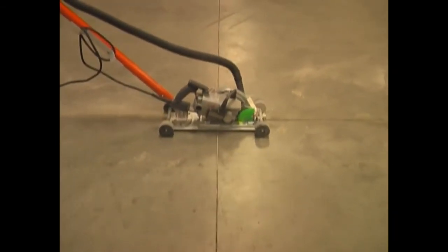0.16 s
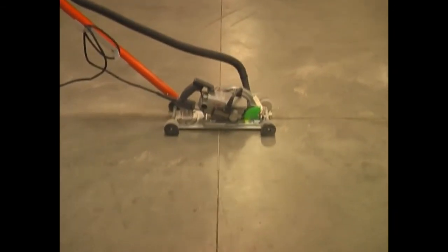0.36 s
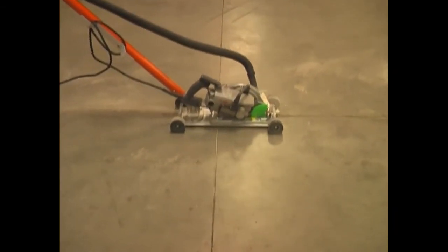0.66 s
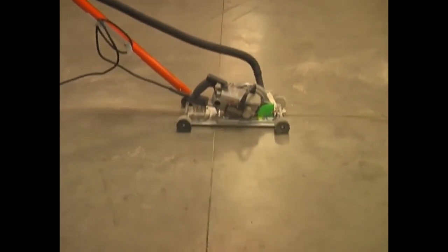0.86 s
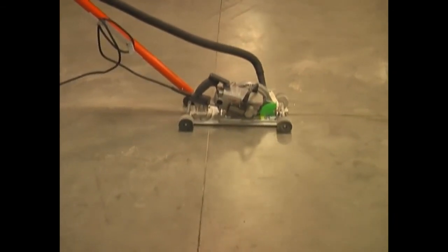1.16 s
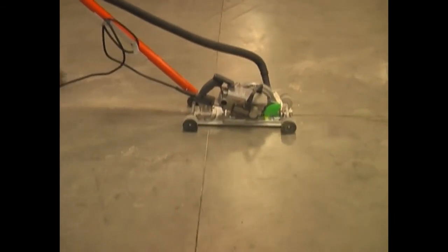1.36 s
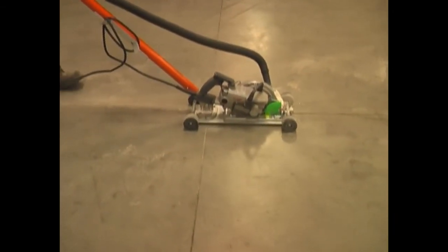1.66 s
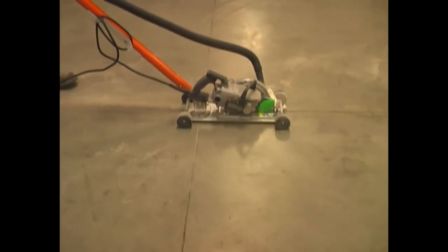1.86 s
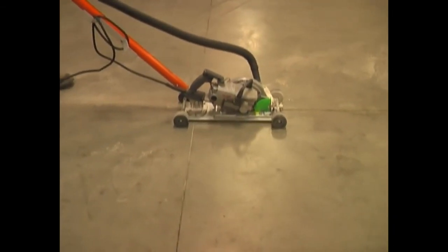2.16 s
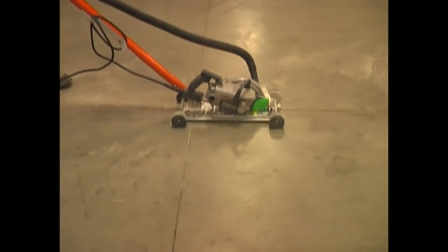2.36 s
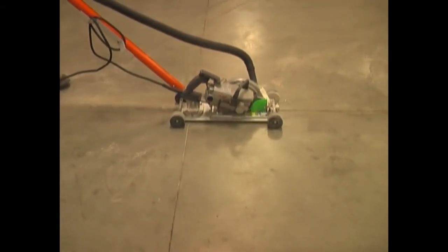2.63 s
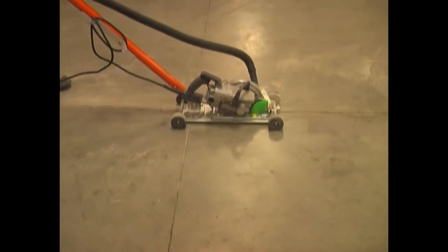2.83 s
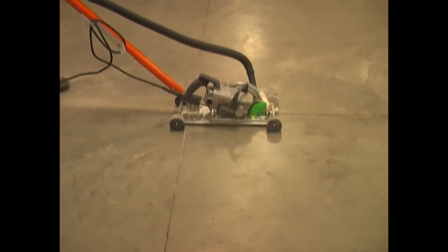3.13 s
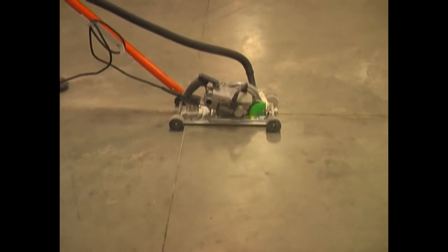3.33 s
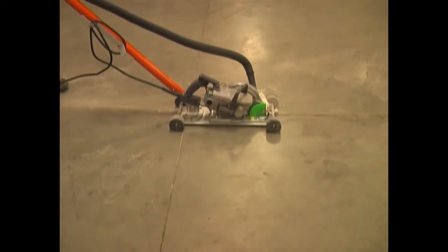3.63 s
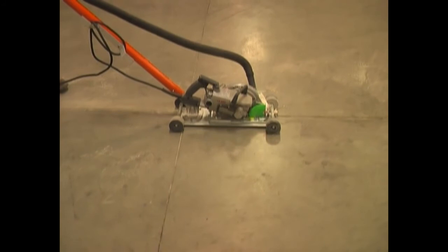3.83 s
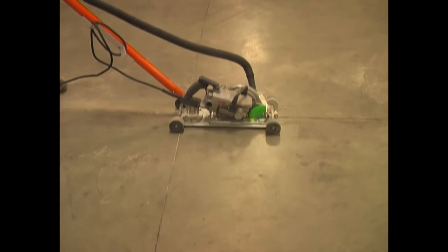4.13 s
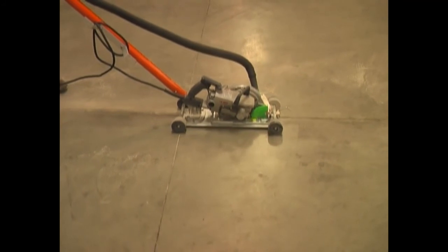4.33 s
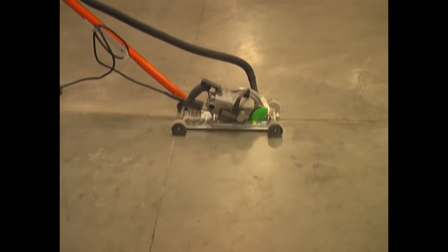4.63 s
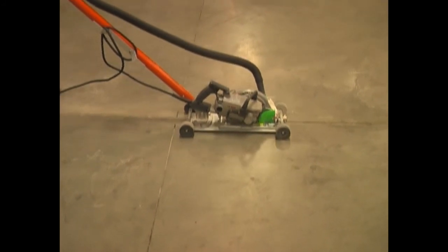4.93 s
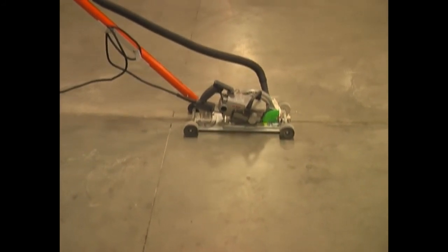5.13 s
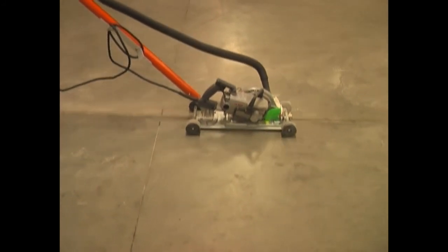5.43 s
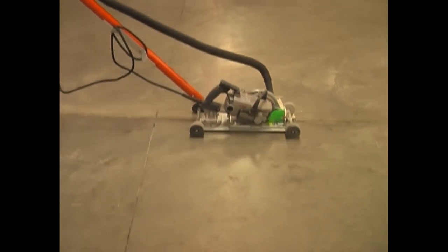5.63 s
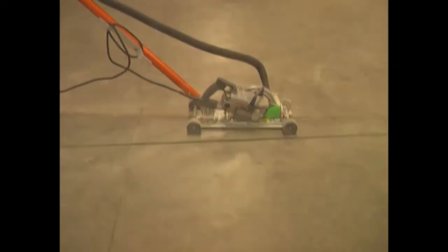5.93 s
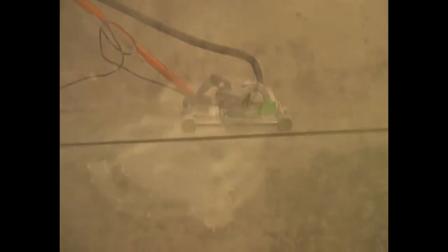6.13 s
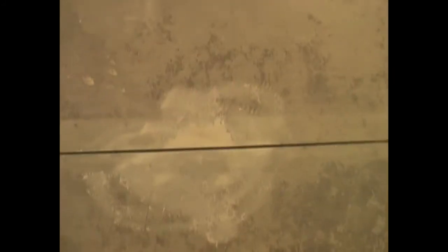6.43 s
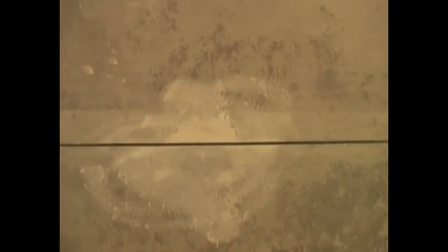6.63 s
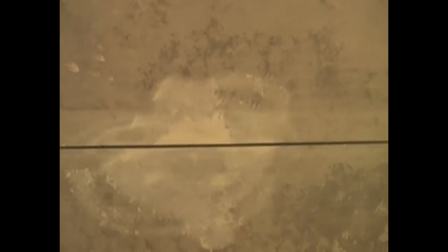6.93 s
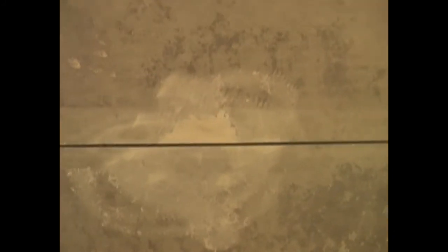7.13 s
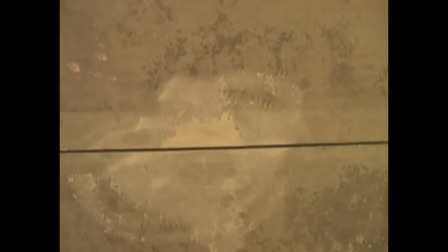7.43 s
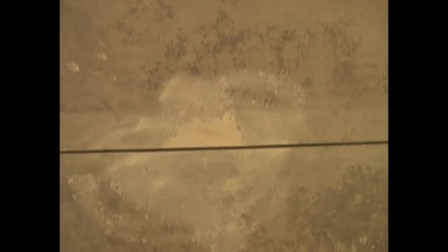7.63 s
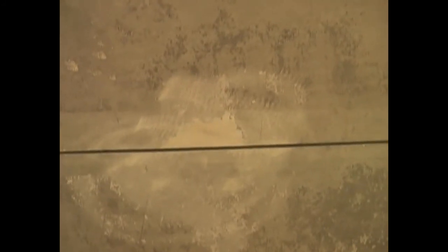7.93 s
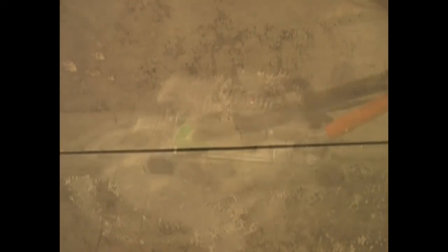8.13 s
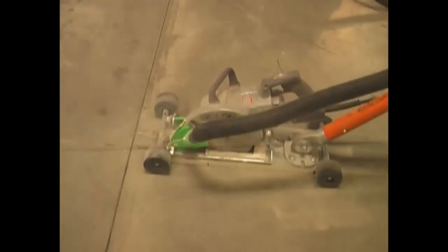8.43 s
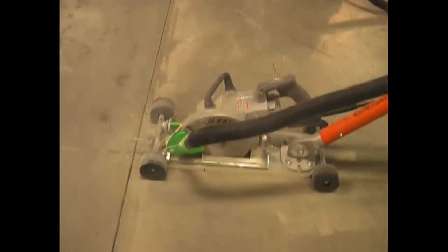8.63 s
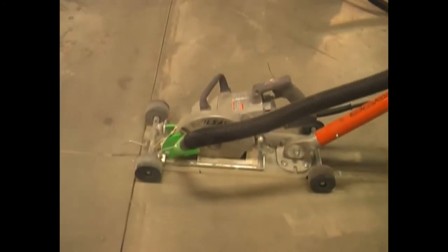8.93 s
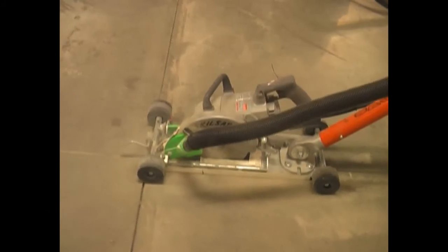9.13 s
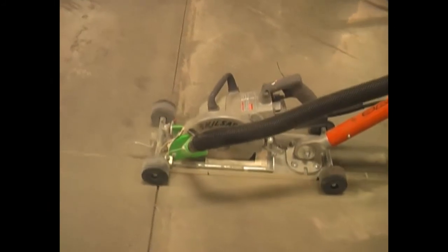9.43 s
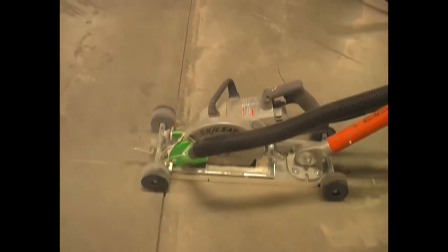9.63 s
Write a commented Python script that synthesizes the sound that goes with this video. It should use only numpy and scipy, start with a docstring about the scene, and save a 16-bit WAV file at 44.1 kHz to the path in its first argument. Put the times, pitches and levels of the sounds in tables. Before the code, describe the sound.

A floor saw is already running in a large, echoing warehouse, heard fairly close in stereo. From 0 to 1.5 s the motor whine rises from about 2.6 to 3.4 kHz over harsh, gritty grinding that pulses with each blade turn. Around 1.9 s the blade bites deep: the whine sags to its lowest near 4 s, while rapid woody-metallic knocks, some hard, rattle unevenly and a thin wavering vacuum whistle sits near 4.5 kHz. From 4.5 s the knocks die away and the motor speeds up again. Between 6 and 6.45 s it fades out, leaving soft, diminishing hiss, low rumble and mains hum, with a clearer tap at 6.6 s and fainter ones at 7.25 and 7.8 s. From 8 s brighter, steadier blade grinding fades in, without the motor whine; knocks ring the metal guard until the end, near 9.8 s, easing slightly.

```python
"""Floor saw in a warehouse

A wheeled saw cuts a joint in concrete: noise swelling once a blade turn rings blade and guard; a deep bite adds
one knock a turn. The motor whines in shaft orders, lower when labouring; a dust vacuum whistles as a wavering sine.
The saw fades to a quiet spot with coloured hiss, taps and mains hum, then fades in from the blade end.
Filtered noise makes the building's rumble and its echo."""
import sys
import numpy as np
from scipy import signal
from scipy.fft import rfft, irfft, next_fast_len
from scipy.io import wavfile
from scipy.ndimage import map_coordinates

SR = 44100
rng = np.random.default_rng(int(sys.argv[2]) if len(sys.argv) > 2 else 0)


def to_wav(sig):
    """Store sig (one row per channel, or 1-D mono) as 16-bit WAV at the path in sys.argv[1].

    Samples outside -1..1 are clipped; the rate is SR.
    """
    pcm = np.clip(np.atleast_2d(sig), -1, 1) * 32767
    pcm = np.round(pcm).astype(np.int16)
    wavfile.write(sys.argv[1], SR, pcm.T)  # frames by channels


N = 430857
TIME = np.arange(N) / SR
SIZE = 2 * next_fast_len(N // 2 + SR // 2)  # even FFT length, padded for tails
HZ = np.fft.rfftfreq(SIZE, 1 / SR)
SIDE_GONE_S, FADE_OUT_S = 6.453, 0.46  # side view: end of fade-out, its length
END_START_S, FADE_IN_S = 7.967, 0.43  # blade-end view: start of fade-in, its length


def amp(db):
    """dB to linear amplitude."""
    return 10 ** (np.asarray(db) / 20)


def unit(x):
    """x scaled to rms 1."""
    return x / np.sqrt(np.mean(x ** 2) + 1e-20)


def along(points, hz=HZ):
    """Interpolate (Hz, value) points on a log frequency axis."""
    point_hz, value = np.transpose(points)
    return np.interp(np.log(hz + 1), np.log(point_hz + 1), value)


def curves(rows):
    """Interpolate each column after the time to one value per sample."""
    time_s, *columns = np.transpose(rows)
    return [np.interp(TIME, time_s, column) for column in columns]


def during(rows, fade_s):
    """1 while a table lasts, fading to 0 outside."""
    inside_s = np.minimum(TIME - rows[0][0], rows[-1][0] - TIME)
    return np.clip(1 + inside_s / fade_s, 0, 1)


def wobble(rate_hz):
    """Smooth random curve through rate_hz normal knots a second."""
    knots = rng.standard_normal(int(N * rate_hz / SR) + 4)
    return map_coordinates(knots, [TIME * rate_hz])


def filtered(x, gain):
    """x through a response on the HZ grid."""
    return irfft(rfft(x, SIZE) * gain, SIZE)[..., :N]


def causal(gain):
    """Minimum-phase response of this gain: it rings only after a blow."""
    cepstrum = irfft(np.log(np.maximum(gain, 1e-6)))
    cepstrum[1:SIZE // 2] *= 2
    cepstrum[SIZE // 2 + 1:] = 0
    return np.exp(rfft(cepstrum))


def tone(pitch_hz):
    """Sine of rms 1 whose phase integrates a pitch curve."""
    return np.sqrt(2) * np.sin(2 * np.pi * np.cumsum(pitch_hz) / SR)


# left-right likeness of noise at the saw: pitch_hz, likeness_0_to_1
SAW_LIKENESS = [(60, 0.51), (150, 1), (380, 0.99), (950, 1), (2380, 0.97), (5980, 0.9), (15000, 0.8)]


def rush(colour, likeness=SAW_LIKENESS, lead_s=0):
    """Coloured stereo noise of rms 1: mid and side set the likeness; lead_s puts the left ear first."""
    turn_rad = np.arccos(np.clip(along(likeness), 0, 1)) / 2
    shares = np.array([np.cos(turn_rad), np.sin(turn_rad)])
    mid, side = filtered(rng.standard_normal((2, N)), amp(along(colour)) * shares)
    lead = np.exp(1j * np.pi * HZ * lead_s * np.array([[1], [-1]]))
    return unit(filtered(np.array([mid + side, mid - side]), lead))


# building rumble colour: pitch_hz, relative_db_per_hz
RUMBLE_COLOUR = [(15, -62), (25, -34), (51, -15), (86, -12), (119, -10.5), (310, -10), (332, -18),
                 (362, -13), (468, -24.5), (585, -16), (1500, -22), (1950, -54), (3300, -120)]
# left-right likeness of rumble and hiss: pitch_hz, likeness_0_to_1
QUIET_LIKENESS = [(60, 0.29), (180, 0.79), (550, 0.86), (1650, 0.5), (4970, 0.64), (15000, 0.5)]
# mains hum partials, before the hum swell: pitch_hz, level_db
MAINS_PARTIALS = [(120, -64), (360, -72), (598, -82)]
# swell of the mains hum: time_s, gain_db
HUM_SWELL = [(0, -17), (1, -9.5), (5.8, -8.5), (6.15, -1), (8.3, 1), (8.55, -9)]


def hum_and_rumble():
    """Mains hum of wavering sines over low building noise, which follows the swell weakly."""
    swell_db, = curves(HUM_SWELL)
    partials = sum(amp(db + wobble(5)) * tone(hz + 0.53 * wobble(4.3)) for hz, db in MAINS_PARTIALS)
    rumble = amp(-61.5 + 0.22 * swell_db) * rush(RUMBLE_COLOUR, QUIET_LIKENESS)
    return amp(swell_db) * partials + rumble


# small taps: start_s, click_db, body_db
TAPS = [(6.608, -41, -12.5), (7.252, -44, -35), (7.802, -48, -35)]
# response of a tapped body: pitch_hz, gain_db
TAP_BODY = [(300, -22), (700, 8), (1050, 3), (1500, -24), (4000, -32), (5300, -13), (7000, -35)]


def taps():
    """Each tap is a decaying click envelope for noise, and an impulse for the tapped body."""
    clicks, blows = np.zeros(N), np.zeros(N)
    for start_s, click_db, body_db in TAPS:
        decay = np.exp(-np.abs(TIME - start_s) / 0.0019)
        clicks += (TIME >= start_s) * amp(click_db) * decay
        blows[round(start_s * SR)] = amp(body_db)
    return clicks, filtered(blows, causal(amp(along(TAP_BODY))))


# hiss and click colour: pitch_hz, relative_db_per_hz
HISS_SHAPE = [(290, -37), (500, -17), (582, -9), (736, -25), (799, -11.5), (1020, -21), (1230, -13.5),
              (2340, -8), (3590, -2.5), (8100, -4.5), (13500, -13.5)]
HISS_DB, HISS_FALL_DB_PER_S = -47.5, 5.5  # level at SIDE_GONE_S, steady fall


def background(quiet):
    """Hum and rumble throughout, uneven falling hiss at the quiet spot, and taps; a little to the left."""
    clicks, tapped = taps()
    fall_db = HISS_FALL_DB_PER_S * (TIME - SIDE_GONE_S)
    uneven_db = 0.54 * wobble(9) + 0.97 * wobble(30) + 1.5 * wobble(400)
    hiss = quiet * amp(HISS_DB - fall_db + uneven_db)
    treble = (hiss + clicks) * rush(HISS_SHAPE, QUIET_LIKENESS, lead_s=1.7e-5)
    bass = hum_and_rumble() + tapped
    left_db = np.array([[1], [-1]])
    return bass * amp(left_db) + treble * amp(2 * left_db)


# decay time of the hall: pitch_hz, t60_s
HALL_DECAY = [(150, 0.91), (2000, 1.6), (12000, 0.2)]
# hall tail against direct sound: pitch_hz, gain_db
HALL_GAIN = [(100, -7), (300, -7.5), (600, -16), (1200, -16.5), (2300, -12), (5000, -21), (12000, -26.5)]


def warehouse(x):
    """Echo off the hall: decaying noise, different at each ear, strong in the bass, short in the treble."""
    hz, time_s, spectrum = signal.stft(rng.standard_normal((2, SR)), SR, nperseg=256)
    t60_s = along(HALL_DECAY, hz)[:, None]
    decaying = spectrum * amp(-60 * time_s / t60_s) / np.sqrt(t60_s)
    tail = signal.istft(decaying, SR, nperseg=256)[1]
    tail /= np.linalg.norm(tail[0])
    return filtered(x.mean(axis=0), rfft(tail, SIZE) * amp(along(HALL_GAIN)))


# vacuum whistle, lower while the saw loads the mains: time_s, pitch_hz, level_db
VACUUM_WHISTLE = [(1.8, 4558, -55), (2.5, 4490, -46), (3, 4535, -43.5), (4, 4487, -46.5), (4.6, 4470, -53),
                  (5.2, 4508, -45), (5.6, 4514, -44)]


def vacuum():
    """Turbine whistle: one sine, wavering in pitch and level along its table."""
    pitch_hz, level_db = curves(VACUUM_WHISTLE)
    whistle = tone(pitch_hz * (1 + 0.00189 * wobble(30)))
    return during(VACUUM_WHISTLE, fade_s=0.33) * amp(level_db + 2.0 * wobble(14)) * whistle


# shaft orders at full speed, before the housing lift: shaft_multiple, level_db
SHAFT_ORDERS = [(1, -57), (2, -54.3), (3, -53), (4, -46.3), (8, -51.5), (16, -56), (32, -53)]
# air thrown by the motor fan: pitch_hz, relative_db_per_hz
FAN_AIR = [(60, -43), (250, -25), (400, -22), (550, -6), (850, -6.5), (1350, -7), (2400, 2), (3000, 3.5),
           (3700, -3.5), (4800, 4), (7000, -13), (11000, -11.5), (15000, -21)]
VANES = 12  # fan whine cycles per shaft turn
WHINE_DB, WHINE_DB_PER_SPEED_DB = -41.2, 3.0  # at full speed, growth


def motor(whine_hz, housing_hz=3520, width_hz=300, lift_db=15.0):
    """Fan whine, shaft orders lifted near the housing resonance, and rushing air; all grow with speed."""
    shaft_hz = whine_hz / VANES * (1 + 0.00048 * wobble(25.06))
    speed_db = 20 * np.log10(whine_hz / whine_hz.max())
    orders = 0
    for multiple, level_db in SHAFT_ORDERS:
        order_hz = multiple * shaft_hz
        housing_db = lift_db / (1 + (2 * (order_hz - housing_hz) / width_hz) ** 2)
        orders = orders + amp(level_db + housing_db + 2.66 * wobble(12)) * tone(order_hz)
    whine_db = WHINE_DB + WHINE_DB_PER_SPEED_DB * speed_db + 1.5 * wobble(20)
    whine = amp(whine_db) * tone(VANES * shaft_hz)
    air = amp(-35 + 2.4 * speed_db) * rush(FAN_AIR)
    return whine + amp(4.7 * speed_db) * orders + air


def singing(blade_hz, guard_hz=1572, width_hz=75, level_db=-43.5):
    """Overtones of the turning blade make the guard sing, each as it passes through the resonance."""
    turn_hz = blade_hz * (1 + 0.002841 * wobble(30))
    waver = amp(2.5 * wobble(15))
    overtones = 0
    for order in range(25, 31):
        order_hz = order * turn_hz
        resonance = 1 / (1 + (2 * (order_hz - guard_hz) / width_hz) ** 2)
        overtones = overtones + resonance * tone(order_hz)
    return amp(level_db) * waver * overtones


def scrape(turns, swing_db, scatter_db, grain_db, snap=0.2):
    """Grit breaking under the blade: spiky noise that swells once a turn, each time with a new force."""
    force = np.interp(turns, np.arange(1000), rng.standard_normal(1000))
    angle_rad = 2 * np.pi * (turns + 0.061 * wobble(50))
    contact = np.sin(angle_rad) + snap * np.sin(2 * angle_rad)  # catches faster than it lets go
    level_db = swing_db * contact + scatter_db * force + grain_db * wobble(900)
    return unit(rng.standard_normal(N) * amp(level_db))


def low_share(corner_hz):
    """Power share below a smooth corner."""
    return 1 / (1 + (HZ / corner_hz) ** 8)


def grind(grit_drive, guard_drive, colour, modes, between_db, grit_db, guard_db,
          guard_top_hz=2300, grit_low_hz=3500):
    """Scraping rings the blade (treble) and its guard (middle) through one set of resonances."""
    peaks = sum(amp(db) ** 2 / (1 + (2 * (HZ - hz) / width_hz) ** 2) ** 1.74 for hz, width_hz, db in modes)
    body = np.sqrt(peaks + amp(along(colour) + between_db) ** 2)
    blade_gain = body * np.sqrt(1 - low_share(grit_low_hz))
    guard_gain = body * np.sqrt(low_share(guard_top_hz))
    blade = unit(filtered(grit_drive, causal(blade_gain)))
    guard = unit(filtered(guard_drive, causal(guard_gain)))
    return amp(grit_db) * blade + amp(guard_db) * guard


# blows that stand out, before each view's level shift: time_s, peak_db
HARD_BLOWS = [(2.109, -15.5), (2.355, -16), (2.552, -17.5), (2.672, -16), (3.001, -17), (3.253, -14.5),
              (3.358, -16.5), (3.7, -17.5), (4.031, -15), (4.338, -21), (8.386, -24), (8.426, -24),
              (8.666, -23), (8.824, -22.5), (8.922, -22), (8.981, -26), (9.077, -26)]


def in_step(rate_hz):
    """Cycles counted at this rate, slipping a little so that one is completed at each hard blow."""
    blow_s = np.transpose(HARD_BLOWS)[0]
    cycles = np.cumsum(rate_hz) / SR
    slip = np.unwrap(np.interp(blow_s, TIME, cycles) % 1, period=1)
    return cycles - np.interp(TIME, blow_s, slip)


def rocking(rate_hz=8.2, depth_db=1.9):
    """The cart rocks on its wheels and presses the blade down at each dip: dB on the knocks."""
    return depth_db * np.cos(2 * np.pi * in_step(np.full(N, rate_hz)))


# response of the knocked cart: pitch_hz, relative_db
CART_BODY = [(70, -33), (190, -21.5), (400, -21.5), (600, -15.5), (700, -9.5), (765, 6), (830, 0),
             (1100, 3), (1350, -11), (1550, -5), (1800, -15.5), (3000, -17), (6000, -50)]
HARD_HALF_S = 0.01  # a hard blow holds about this long each way


def knocks(turns, force, hard_db, scatter_db, chatter_db, chatter_s=0.0028):
    """The blade's high spot strikes the concrete once a turn and shakes the cart; a few blows land hard."""
    hard, hard_force = 0, 0
    for blow_s, peak_db in HARD_BLOWS:
        moment = np.exp(-((TIME - blow_s) / HARD_HALF_S) ** 4)
        hard = hard + moment
        hard_force = hard_force + moment * amp(peak_db + hard_db)
    at = np.flatnonzero(np.diff(np.floor(turns)) > 0)
    chance = rng.uniform(-0.93, 1, (len(at), 2)) * (1 - hard[at, None])  # hard blows stay exact
    shift = (chance[:, 0] * 0.0006 * SR).astype(int)
    blows = np.zeros(N)
    blows[np.clip(at + shift, 0, N - 1)] = amp(scatter_db * chance[:, 1])
    decay = np.exp(-TIME[:SR // 20] / chatter_s)  # crumbs follow each blow
    decay /= np.linalg.norm(decay)
    chatter = signal.fftconvolve(blows, decay)[:N] * rng.standard_normal(N)
    thuds = unit(filtered(blows + amp(chatter_db) * chatter, causal(amp(along(CART_BODY)))))
    return ((1 - hard) * force + hard_force) * thuds


GUARD_RISE_DB = 2  # guard level rise from no bite to full depth, both views
# blade speed: time_s, turns_per_s
END_BLADE_SPEED = [(8, 51.3), (8.7, 51.7), (9.2, 52), (9.77, 53.6)]
# depth of cut: time_s, depth_0_to_1
END_BITE_DEPTH = [(8.25, 0.75), (8.42, 0.75), (8.49, 0.15), (8.58, 0.3), (8.66, 0.75), (9.14, 0.83),
                  (9.25, 0.6), (9.77, 0.3)]
# guard and blade resonances: pitch_hz, width_hz, relative_db
END_RESONANCES = [(1540, 340, -2.5), (2110, 65, -5), (4210, 100, -3.5), (4790, 180, -6.5),
                  (6360, 130, -2.5), (8430, 170, 2.5), (9830, 330, -5.5), (11030, 55, -2), (12840, 220, -7)]
# grinding between the resonances: pitch_hz, relative_db_per_hz
END_GRIND_COLOUR = [(88, -54), (150, -20.5), (459, -18.5), (918, -7.5), (1300, -11.5), (1540, -5.5),
                    (1770, -12), (2140, -7.5), (2500, -8.5), (3600, -9.5), (4120, -8.5), (5950, -7.5),
                    (8250, -1), (9090, -7.5), (15000, -12.5)]


def saw_from_end(ring_hz=1555, ring_width_hz=110, ring_db=18):
    """Nearer the open blade: brighter, steady grinding without the motor; each knock rings the guard."""
    turns = in_step(curves(END_BLADE_SPEED)[0])
    bite = np.clip(curves(END_BITE_DEPTH)[0], 0, None)
    early = turns + 0.32  # grit bursts just before the guard rattles
    grit = scrape(early, swing_db=2.8, scatter_db=0.53, grain_db=1.0)
    guard = scrape(turns, swing_db=1, scatter_db=1.5, grain_db=0.9)
    grit_db = -28 + 0.54 * wobble(14)
    guard_db = -40.5 + GUARD_RISE_DB * bite
    cut = grind(grit, guard, END_GRIND_COLOUR, END_RESONANCES, between_db=-2.5,
                grit_db=grit_db, guard_db=guard_db)
    rattle = knocks(turns, bite * amp(-43), hard_db=-14.3, scatter_db=5.0, chatter_db=-7)
    ring = 1j * HZ * ring_width_hz / (ring_hz ** 2 - HZ ** 2 + 1j * HZ * ring_width_hz)
    return cut + rattle + amp(ring_db) * filtered(rattle, ring ** 2)


GEARING = 4.75  # motor turns per blade turn
# motor speed as fan whine: time_s, pitch_hz
WHINE_PITCH = [(0, 2620), (0.18, 2691), (0.73, 3022), (0.97, 3278), (1.5, 3453), (1.82, 3332), (2.21, 3002),
               (2.65, 2810), (3.3, 2705), (3.96, 2575), (4.53, 2655), (4.76, 2905), (5.25, 3310),
               (5.65, 3448), (6.4, 3590)]
# depth of cut: time_s, depth_0_to_1
SIDE_BITE_DEPTH = [(0.8, 0.0049), (0.98, 0.35), (1.3, 0), (1.6, 0.36), (1.77, 0.29), (1.92, 1), (2.5, 0.89),
                   (3.35, 0.91), (3.9, 0.72), (4.35, 0.4), (4.62, 0.14)]
# strength of the grinding: time_s, level_db
GRIT_LEVEL = [(0.06, -30.5), (0.11, -29.5), (0.51, -28), (0.87, -32), (0.94, -29), (1.81, -29),
              (2.08, -33.5), (3.76, -31), (3.81, -29.5), (5.42, -29), (6.0, -29.5)]
# guard and blade resonances: pitch_hz, width_hz, relative_db
SIDE_RESONANCES = [(775, 65, -6), (1584, 62, -1), (1915, 180, -7), (4900, 110, -2), (5664, 330, -4.5),
                   (6510, 140, -5), (6980, 170, -3.5), (8330, 185, 0), (10130, 550, -9.5)]
# grinding between the resonances: pitch_hz, relative_db_per_hz
SIDE_GRIND_COLOUR = [(88, -66), (150, -36), (178, -21), (393, -20.5), (661, -12), (757, -1), (1350, -8),
                     (1510, 4.5), (1770, -10.5), (2650, -7), (3210, -15.5), (4810, -5), (6060, -7),
                     (8250, -1.5), (15000, -18.5)]


def saw_from_side():
    """The motor drives the blade through a gear, so bursts and knocks follow its whine."""
    whine_hz, = curves(WHINE_PITCH)
    bite = np.clip(curves(SIDE_BITE_DEPTH)[0], 0, None)
    blade_hz = whine_hz / VANES / GEARING
    turns = in_step(blade_hz)
    load = 1 - whine_hz / whine_hz.max()
    swing_db = 3.0 + 5.0 * load - 1.8 * bite  # laboured: distinct bursts; deep: steadier
    grit = scrape(turns, swing_db, scatter_db=0.95, grain_db=0.9)
    guard = scrape(turns, swing_db=2.5, scatter_db=0.85, grain_db=1.5)
    grit_db = curves(GRIT_LEVEL)[0] + 0.37 * wobble(10)
    guard_db = -38 + GUARD_RISE_DB * bite + 1.04 * wobble(9)
    cut = grind(grit, guard, SIDE_GRIND_COLOUR, SIDE_RESONANCES, between_db=-3.5,
                grit_db=grit_db, guard_db=guard_db)
    force = bite * amp(-32.6 + rocking())
    thuds = knocks(turns, force, hard_db=-11.8, scatter_db=2.1, chatter_db=-8.5)
    return cut + thuds + singing(blade_hz) + motor(whine_hz)


def scene():
    """Three places in the hall, cross-faded: beside the saw, the quiet spot, the saw's blade end."""
    side = np.clip((SIDE_GONE_S - TIME) / FADE_OUT_S, 0, 1)
    end = np.clip((TIME - END_START_S) / FADE_IN_S, 0, 1)
    from_side = saw_from_side() + vacuum()
    from_end = np.tile(saw_from_end(), (2, 1))
    beside = side * (from_side + warehouse(from_side))
    at_end = end * (from_end + warehouse(from_end))
    return background(1 - side - end) + beside + at_end


def record(dry, top_hz=15050):
    """Sharp band limit: nothing passes at or above top_hz."""
    return filtered(dry, HZ < top_hz)


dry = scene()
out = record(dry)
to_wav(out)
```